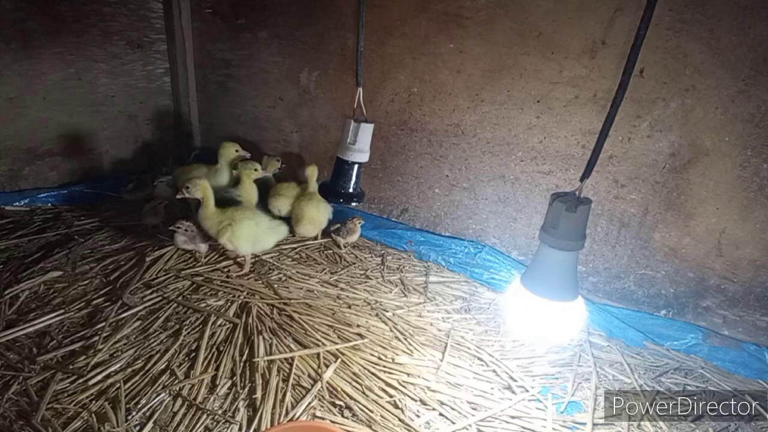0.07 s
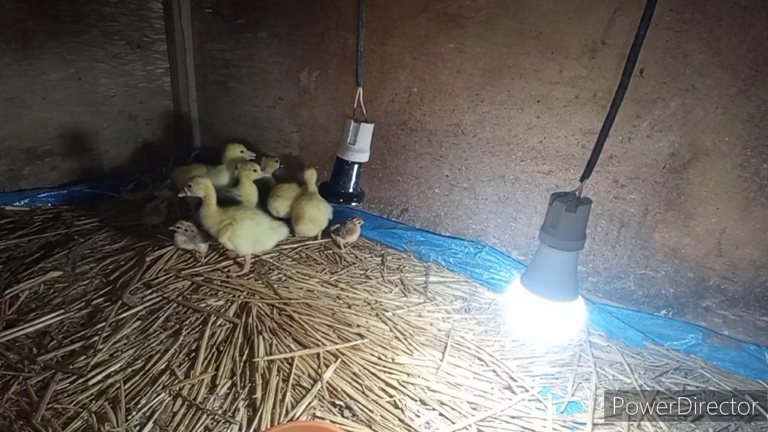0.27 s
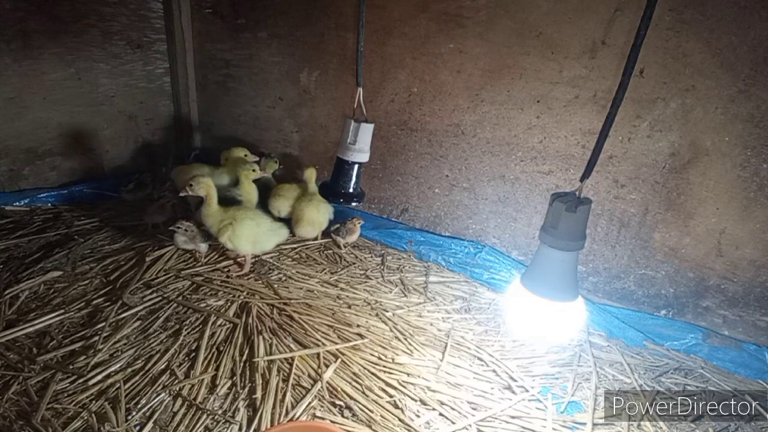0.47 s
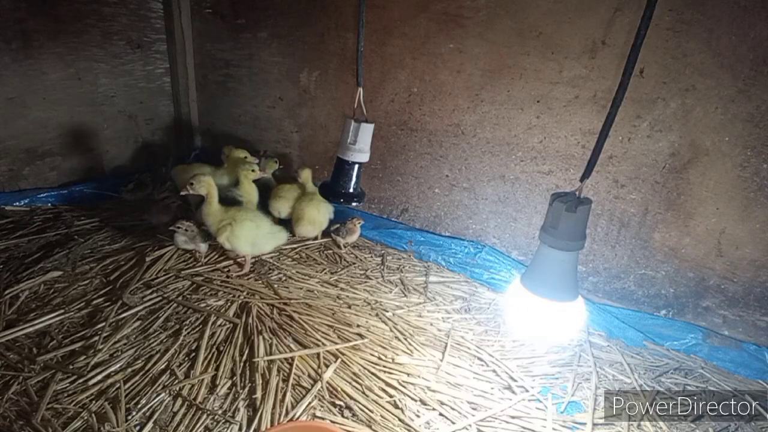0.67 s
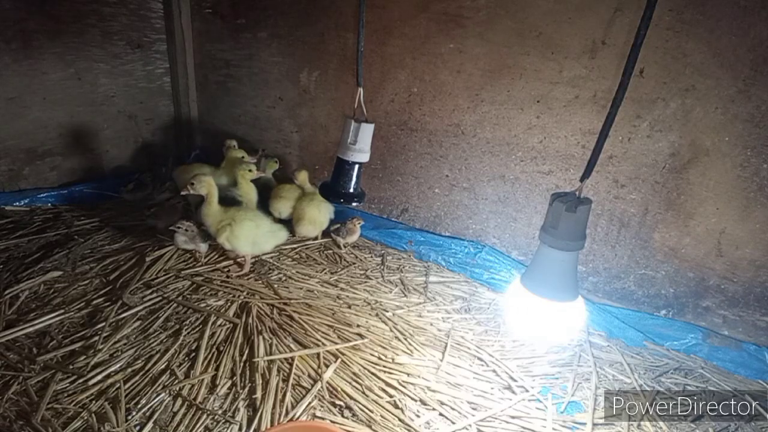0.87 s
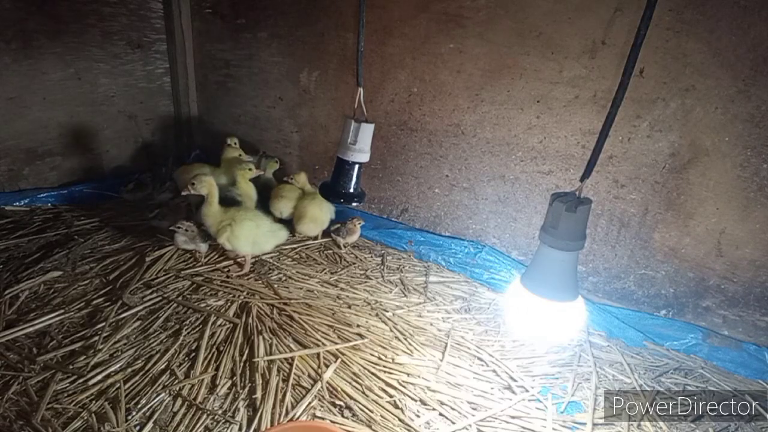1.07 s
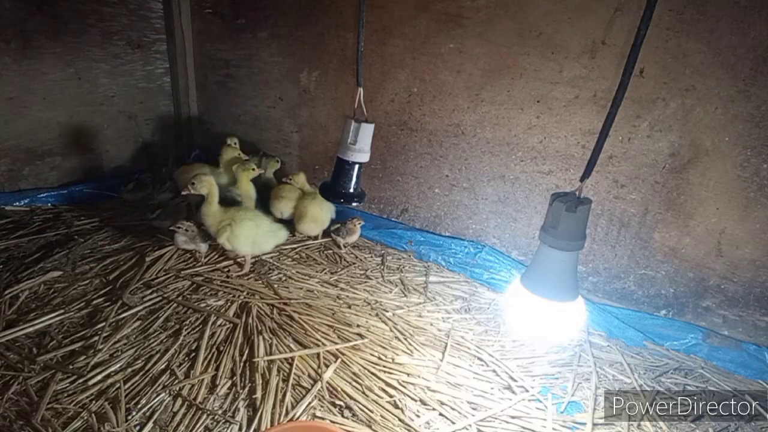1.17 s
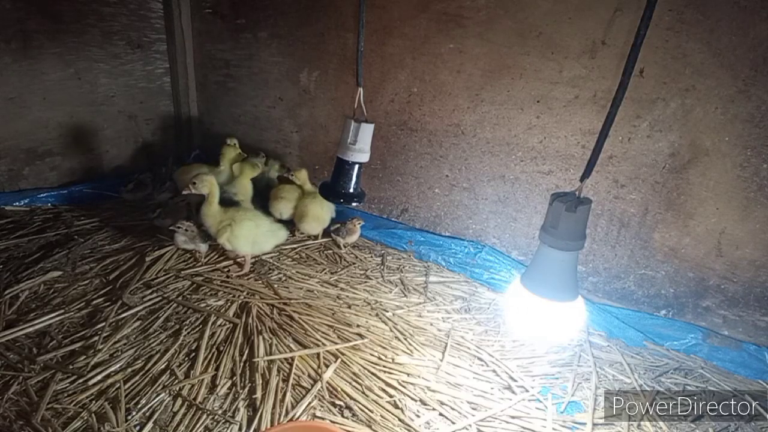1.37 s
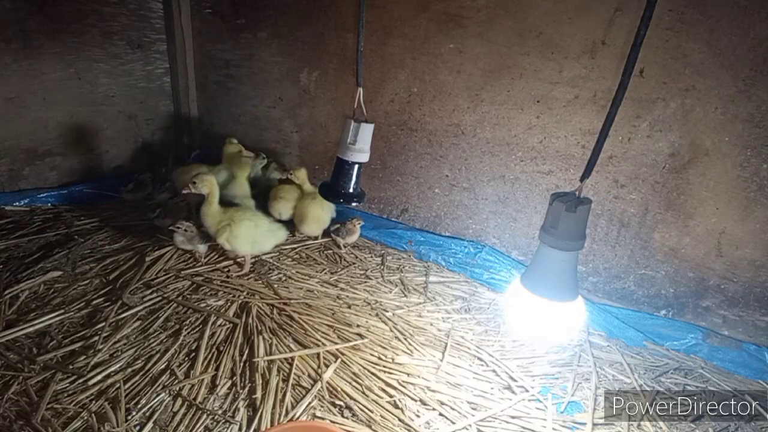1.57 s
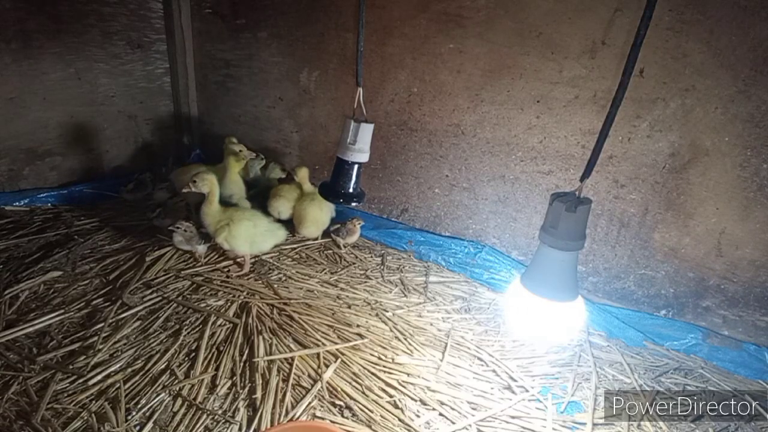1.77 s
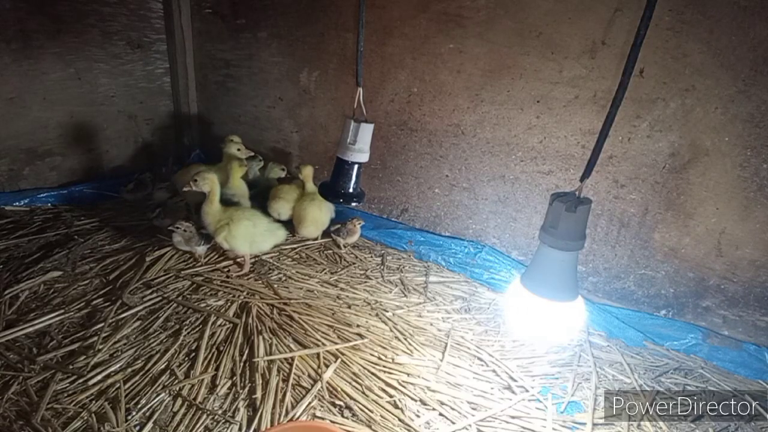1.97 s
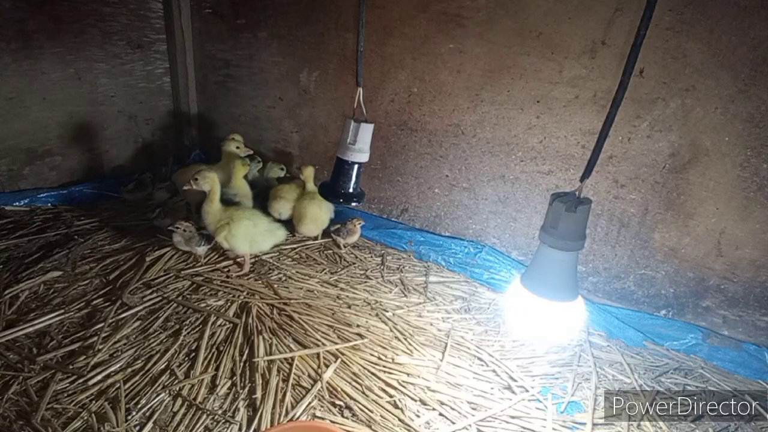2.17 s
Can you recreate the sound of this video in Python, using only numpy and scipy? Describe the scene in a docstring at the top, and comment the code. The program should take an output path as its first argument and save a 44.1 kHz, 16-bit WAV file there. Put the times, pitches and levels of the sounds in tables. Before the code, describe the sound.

Young goslings peeping busily in a boarded pen, chicks cheeping thinly among them over faint straw rustle

```python
"""After a short silence, gosling calls begin in a small boarded brooder: whistles with overtones whose pitch
glides, often up and back down. Room air and a low hum swell underneath. Thin chick peeps soon join in, made
the same way. Then come soft footfalls (ringing low noise), straw rustle (tiny random crackles) with single
snaps, and two low drones that come and go. A short soft hoot sounds midway, and calls go on to the end.
Dense wall echoes smear the birds and straw throughout."""
import sys
import numpy as np
from scipy import signal
from scipy.fft import rfft, irfft, next_fast_len
from scipy.io import wavfile
from scipy.ndimage import uniform_filter1d

SR = 44100
rng = np.random.default_rng(int(sys.argv[2]) if len(sys.argv) > 2 else 0)


def generate_wav(sig):
    """Save sig (samples, or channels by samples) to the path in sys.argv[1] as 16-bit PCM at SR."""
    pcm = np.round(np.clip(np.atleast_2d(sig).T, -1, 1) * 32767).astype(np.int16)
    wavfile.write(sys.argv[1], SR, pcm)


N = 97108


def amp(db):
    """Turns dB into gain."""
    return 10 ** (np.asarray(db) / 20)


def unit(x):
    """Scales a sound to an rms level of 1."""
    return x / np.sqrt(np.mean(x ** 2) + 1e-20)


def along(points, hz):
    """Reads a value at each frequency from (Hz, value) points, on a log frequency axis."""
    point_hz, value = np.transpose(points)
    return np.interp(np.log(hz + 1), np.log(point_hz + 1), value)


def curve(rows):
    """Draws straight lines through (seconds, value) rows, giving a value at every sample."""
    return np.interp(np.arange(N) / SR, *np.transpose(rows))


def wobble(rate):
    """A smooth random curve that eases between random knots, rate knots a second."""
    knots = rng.standard_normal(int(N * rate / SR) + 2)
    position = np.arange(N) * rate / SR
    before = position.astype(int)
    ease = (1 - np.cos(np.pi * (position % 1))) / 2
    return knots[before] * (1 - ease) + knots[before + 1] * ease


def filtered(x, response):
    """Multiplies the spectrum of x by a response that depends on frequency."""
    size = next_fast_len(N + SR // 2)
    return irfft(rfft(x, size) * response(np.fft.rfftfreq(size, 1 / SR)), size)[..., :N]


def coloured(x, points):
    """Shapes x by (Hz, dB) points, falling away below the first."""
    shape = [(points[0][0] / 3, -60)] + list(points)
    return filtered(x, lambda hz: amp(along(shape, hz)))


def narrow(hz, width):
    """Noise passed through one resonance, rms 1; gain is halved at width Hz from the centre."""
    return unit(filtered(rng.standard_normal(N), lambda f: 1 / (1 + ((f - hz) / width) ** 2)))


def whistle(rows, overtone_db, bright_db=0):
    """A gliding, fluttering tone, rougher when high and duller when falling; also returns its air flow."""
    # How the beak favours some frequencies. Each row: frequency in Hz, gain in dB.
    beak = [(700, 3.5), (1500, -0.5), (3000, 3), (4000, -7), (5500, -15.5), (7000, -8), (9000, -18),
            (12000, 6)]
    attack_s, release_s = 0.0031, 0.0045
    jitter = 0.01197  # pitch wobble, as a fraction of the pitch
    strain_hz, strain_jitter = 1698, 3  # hoarse above this pitch: extra multiples of the jitter per octave
    shimmer_db, flutter_per_s = 2.5, 130
    fall_dull_db = 6.5  # overtones lost in a fast fall of pitch

    s, hz, db = np.transpose(rows)
    on = slice(int(s[0] * SR), min(N, int((s[-1] + release_s) * SR)))
    t = np.arange(N)[on] / SR
    glide = uniform_filter1d(np.interp(t, s, hz), size=200, mode="nearest")
    strain = np.log2(np.maximum(glide / strain_hz, 1))
    pitch = glide * (1 + jitter * (1 + strain_jitter * strain) * wobble(150)[on])
    phase = 2 * np.pi * np.cumsum(pitch) / SR

    # 0 when steady or rising, 1 in a fast fall
    falling = np.clip(-np.gradient(np.log(glide)) * SR / 5, 0, 1)
    upper_db = bright_db - fall_dull_db * falling + shimmer_db * wobble(flutter_per_s)[on]
    tone = np.zeros(len(t))
    for k, level_db in enumerate(overtone_db, 1):
        gain = amp(level_db + along(beak, k * pitch) + (k > 1) * upper_db)
        tone += gain * np.sin(k * phase) * (k * pitch < SR / 2)

    fade_in = (t - s[0]) / attack_s
    fade_out = (s[-1] - t) / release_s + 1
    edge = np.clip(np.minimum(fade_in, fade_out), 0, 1)
    loud = amp(np.interp(t, s, db) + shimmer_db * wobble(flutter_per_s)[on]) * edge
    out = np.zeros((2, N))
    out[:, on] = loud * tone, loud
    return out


def birds():
    """All the whistled calls, plus breath noise that gets stronger with their effort."""
    # One list per gosling call. Each row: time in seconds, pitch in Hz, level in dB before the beak shapes it.
    gosling_calls = [
        [(.146, 1430, -60), (.16, 1593, -54), (.175, 1673, -52.5), (.186, 2350, -61), (.205, 2400, -65.5),
         (.225, 1800, -59.5), (.24, 1350, -54.5)],
        [(.17, 1150, -66.5), (.2, 1400, -64), (.26, 1656, -55.5), (.3, 1953, -60), (.33, 1780, -60.5),
         (.36, 1360, -52), (.375, 1197, -49.5)],
        [(.19, 1218, -69), (.26, 1258, -64.5), (.31, 1322, -73), (.33, 1282, -54.5)],
        [(.365, 1337, -56.5), (.385, 1698, -39), (.425, 1865, -44), (.45, 2766, -43.5), (.475, 2947, -53.5),
         (.49, 2540, -54.5), (.5, 1647, -45), (.53, 1432, -54)],
        [(.425, 1889, -74), (.455, 1705, -45), (.475, 1301, -53), (.52, 1266, -71), (.56, 1277, -53),
         (.62, 1185, -91)],
        [(.64, 1250, -53), (.66, 1597, -40), (.69, 1850, -39), (.72, 2770, -46), (.75, 2983, -49.5),
         (.765, 2357, -59.5), (.78, 1587, -42), (.81, 1490, -74), (.84, 1230, -79)],
        [(.655, 1234, -58), (.7, 1550, -61.5), (.74, 1750, -53), (.765, 1790, -47), (.785, 1303, -51.5),
         (.81, 1153, -63.5)],
        [(.936, 1250, -61), (.96, 1606, -42), (.995, 1975, -47), (1.005, 2391, -49), (1.015, 2503, -87),
         (1.03, 2283, -88), (1.05, 1654, -46.5), (1.065, 1186, -57)],
        [(1.2, 1097, -56.5), (1.225, 1407, -37.5), (1.25, 1596, -43), (1.27, 1512, -55), (1.295, 1800, -48.5),
         (1.32, 1412, -38.5), (1.34, 1178, -44.5), (1.37, 1315, -48.5), (1.39, 1236, -68.5)],
        [(1.22, 1057, -61.5), (1.25, 1184, -57), (1.29, 1267, -59)],
        [(1.275, 1500, -45.5), (1.3, 1860, -48), (1.33, 2100, -57.5), (1.36, 1900, -52.5), (1.39, 1402, -56.5),
         (1.41, 1157, -76), (1.45, 1285, -92)],
        [(1.502, 1200, -52), (1.52, 1416, -45), (1.57, 1656, -35), (1.585, 1977, -46), (1.6, 2500, -46.5),
         (1.63, 2550, -60.5), (1.642, 2183, -60), (1.652, 1696, -44), (1.668, 1487, -42.5), (1.69, 1304, -50),
         (1.72, 1117, -54)],
        [(1.575, 2012, -38), (1.59, 2572, -53.5), (1.608, 2880, -58.5), (1.618, 1832, -41), (1.63, 1350, -42.5),
         (1.7, 1311, -92.5), (1.75, 1208, -64)],
        [(1.785, 1420, -44), (1.81, 1704, -41), (1.84, 1855, -39), (1.86, 2560, -38), (1.875, 2963, -50),
         (1.89, 2734, -50.5), (1.905, 2190, -51.5), (1.92, 1566, -42.5), (1.94, 1503, -55)],
        [(1.81, 1255, -46.5), (1.85, 1808, -42), (1.87, 1840, -55), (1.885, 1295, -45), (1.9, 1095, -59.5),
         (1.93, 1313, -51.5)],
        [(1.95, 1353, -50.5), (1.98, 1338, -47.5), (2.02, 1283, -79), (2.05, 1210, -109)],
        [(2.105, 1195, -48), (2.15, 1613, -40.5), (2.175, 2113, -39), (2.19, 2630, -37.5), (2.205, 3060, -53)],
    ]
    # Overtone boost, one value in dB per gosling call.
    gosling_bright_db = [0.15, 0.1, 0.1, 0.1, 0.1, 0.13, 0.084, 0.14, 0.1, 9, 0.19, 0.1, 0.1, 0.1, 0.1,
                         0.074, 0.039]
    # One list per chick peep. Each row: time in seconds, pitch in Hz, level in dB before the beak.
    chick_peeps = [
        [(.32, 3200, -68), (.345, 2950, -67), (.36, 2550, -74.5)],
        [(.495, 3410, -54.5), (.52, 3205, -58.5), (.545, 3000, -73)],
        [(.775, 3417, -52), (.8, 3210, -67), (.83, 2970, -76)],
        [(.57, 3200, -56.5), (.6, 2850, -53.5), (.64, 2750, -60)],
        [(.86, 2850, -93), (.89, 2800, -126), (.93, 2800, -60)],
        [(.955, 2500, -49), (.98, 2650, -64), (1.0, 2700, -48.5)],
        [(1.035, 3600, -65), (1.055, 3250, -70), (1.075, 2900, -71)],
        [(1.085, 3000, -53), (1.1, 2700, -59.5), (1.12, 2300, -66)],
        [(1.12, 3400, -55), (1.135, 3100, -53.5), (1.155, 2800, -63)],
        [(1.235, 3710, -54.5), (1.25, 4000, -43), (1.265, 3550, -64)],
        [(1.345, 3650, -71), (1.36, 3250, -56), (1.375, 2900, -58)],
        [(1.64, 3300, -71), (1.68, 2500, -75), (1.7, 2700, -86), (1.72, 2400, -73)],
        [(1.9, 3350, -56), (1.92, 3000, -75), (1.94, 2700, -67)],
        [(2.025, 2353, -55), (2.05, 2200, -57), (2.075, 2160, -64)],
        [(1.99, 3500, -52), (2.02, 2800, -49.5), (2.045, 2500, -49), (2.07, 2400, -65)],
    ]
    # A short soft hoot. Each row: time in seconds, pitch in Hz, level in dB before the beak.
    low_note = [(1.22, 697, -60), (1.25, 768, -49.5), (1.28, 770, -88)]
    # Strength of the main note and then of each overtone, in dB.
    gosling_overtone_db = [1, -10.5, -16.5, -27, -33, -80.5, -96]
    chick_overtone_db = [-6.5, -19, -37]
    # Colour of the breath noise. Each row: frequency in Hz, relative level in dB.
    breath_colour = [(2000, 11), (3000, -5.5), (4200, 12.5), (5500, -17.5), (7000, 8), (9000, -4),
                     (11000, -4.5), (12500, -26.5)]
    breath_db = -38.5  # relative to the air flow

    goslings = sum(whistle(call, gosling_overtone_db, bright)
                   for call, bright in zip(gosling_calls, gosling_bright_db))
    others = sum(whistle(call, chick_overtone_db) for call in chick_peeps + [low_note])
    tones, loud = goslings + others
    breath = unit(coloured(rng.standard_normal(N), breath_colour))
    return tones + amp(breath_db) * loud * breath


def straw():
    """Dense tiny crackles under moving feet, and a few single snaps."""
    # Rustle loudness. Each row: time in seconds, level in dB.
    rustle_level = [(.15, -114), (.53, -100), (.55, -85), (.6, -102), (.65, -79), (.72, -68), (.8, -94),
                    (.865, -87), (.88, -72.5), (.93, -93), (.95, -67.5), (.98, -89), (1.0, -79),
                    (1.035, -64.5), (1.07, -96), (1.13, -85), (1.18, -68.5), (1.21, -82.5), (1.3, -72.5),
                    (1.4, -111), (1.48, -82), (1.5, -81.5), (1.55, -90), (1.7, -98), (1.75, -82),
                    (1.8, -79), (1.95, -106), (2.0, -90), (2.03, -79), (2.06, -82.5), (2.1, -97),
                    (2.14, -76), (2.2, -64)]
    # Rustle colour. Each row: frequency in Hz, relative level in dB.
    rustle_colour = [(2500, -21), (4500, 7), (5600, -28), (7000, 10.5), (9000, -14.5), (11000, 6.5),
                     (12500, 4)]
    # Single straws. Each row: time in seconds, click level in dB before it is filtered.
    snap_rows = [(0.5494, -50), (0.8729, -41.5), (0.9453, -55), (1.0344, -42.5), (1.4935, -67),
                 (1.7455, -49), (1.9909, -65)]
    crackles_per_s, scatter_db, hiss = 1000, 1.5, 0.26

    hits = rng.random(N) < crackles_per_s / SR
    crackle = hits * rng.standard_normal(N) * amp(scatter_db * rng.exponential(size=N))
    grain = crackle + hiss * rng.standard_normal(N)
    rustle = unit(coloured(grain, rustle_colour)) * amp(curve(rustle_level))
    snaps = np.zeros(N)
    for s, db in snap_rows:
        snaps[round(s * SR)] = amp(db)
    # one broad resonance at 7000 Hz, 9000 Hz wide
    return rustle + filtered(snaps, lambda hz: 1j * hz * 9000 / (7000 ** 2 - hz * hz + 1j * hz * 9000))


def walls(x):
    """Dense echoes of the boards: decaying noise in which each frequency dies at its own speed."""
    # Each row: frequency in Hz, time to die away by 60 dB in seconds.
    decay = [(200, 0.18), (1200, 0.13), (2000, .15), (3200, 0.12), (8000, 0.083)]
    delay_s = 0.001974
    hz, t, z = signal.stft(rng.standard_normal(SR // 2), SR, nperseg=256)
    fading = z * amp(-60 * t / along(decay, hz)[:, None])
    tail = signal.istft(fading, SR, nperseg=256)[1]
    delayed = np.pad(x, (round(delay_s * SR), 0))
    return signal.fftconvolve(delayed, tail / np.linalg.norm(tail))[:N]


def steps():
    """Soft footfalls that stir the low resonances of the box: bursts of narrow-band noise."""
    # Each row: start in seconds, level in dB before the rise and decay shape it.
    footfalls = [(.47, -62.5), (0.681, -69.5), (0.958, -53), (1.128, -56), (1.273, -52), (1.378, -63.5),
                 (1.52, -63), (1.8, -70.5), (1.959, -65), (2.128, -56.5)]
    # Box resonances. Each row: frequency in Hz, half-width in Hz, relative level in dB.
    box_modes = [(159, 25, -3.5), (250, 10, 7), (283, 13.6, -5), (402, 84, 11), (616, 17, 1.5),
                 (702, 69, -15), (910, 67, 1)]
    rise_s, t60_s = 0.0073, 0.22  # t60: time to die away by 60 dB

    t = np.arange(N) / SR
    shape = np.zeros(N)
    for s, db in footfalls:
        decay = amp(db - 60 * np.maximum(t - s, 0) / t60_s)
        shape += decay * np.clip((t - s) / rise_s, 0, 1)
    return shape * unit(sum(amp(db) * narrow(hz, width) for hz, width, db in box_modes))


def background():
    """Room air, blurred far peeping, a wavering hum and two drones, all made from filtered noise."""
    # Air colour. Each row: frequency in Hz, relative level in dB.
    air_colour = [(25, -5.5), (40, -5), (80, -9), (110, -26.5), (135, -20), (230, -15), (450, -20.5),
                  (800, -29), (1300, -28.5), (2800, -30), (3800, -40), (7000, -52), (12000, -59)]
    # Wavering hum. Each row: frequency in Hz, half-width in Hz, level in dB before waver and fade.
    hum_bands = [(47.2, 14.8, -69.5)]
    # Faint far-off peeping, blurred into narrow bands. Columns as for the hum.
    murmur_bands = [(1267, 120, -85.5), (2860, 60, -86.5)]
    # Fade of the air, hum and murmur. Each row: time in seconds, gain in dB.
    fade_in = [(.146, -12), (.25, -7.5), (.4, 1), (.5, 4.5)]
    # The two drones. Each row: frequency in Hz, half-width in Hz.
    drone_bands = [(172, 17), (297, 8.7)]
    # Drone loudness. Each row: time in seconds, lower drone's level in dB, upper drone's level in dB.
    drone_levels = np.array([(0.15, -99, -92), (0.57, -62, -67), (0.66, -87.5, -72), (0.94, -74, -71.5),
                             (0.99, -58, -61.5), (1.21, -85, -72), (1.28, -83, -62.5), (1.31, -61.5, -73),
                             (1.39, -73.5, -58.5), (1.47, -78.5, -78), (1.53, -66.5, -66), (1.62, -87, -86),
                             (1.67, -75.5, -68.5), (1.83, -61.5, -95), (1.91, -100, -67.5),
                             (1.99, -77, -69.5), (2.14, -87, -74), (2.2, -76, -97)])
    air_db = -72  # before waver and fade

    air = amp(air_db + 0.88 * wobble(6.41)) * unit(coloured(rng.standard_normal(N), air_colour))
    bands = sum(amp(db + 2.8 * wobble(6.04)) * narrow(hz, width)
                for hz, width, db in hum_bands + murmur_bands)
    drones = sum(amp(curve(drone_levels[:, [0, k]])) * narrow(hz, width)
                 for k, (hz, width) in enumerate(drone_bands, 1))
    return (air + bands) * amp(curve(fade_in)) + drones


def scene():
    """Birds and straw with their wall echoes, over the footfalls and background."""
    wall_db = 3
    near = birds() + straw()
    return (near + amp(wall_db) * walls(near) + steps() + background())[None]


def record(dry):
    """Keeps a short silence at the start and lets almost nothing through above the band limit."""
    start_s = 0.146
    top_hz, leak_db, end_hz = 12000, -36, 15200  # a faint leak from top to end, then nothing
    on = dry * (np.arange(N) >= start_s * SR)
    return filtered(on, lambda hz: np.where(hz < top_hz, 1, amp(leak_db) * (hz < end_hz)))


dry = scene()
out = record(dry)
generate_wav(out)
```